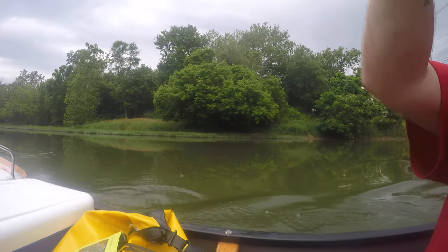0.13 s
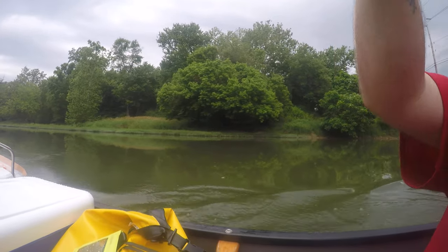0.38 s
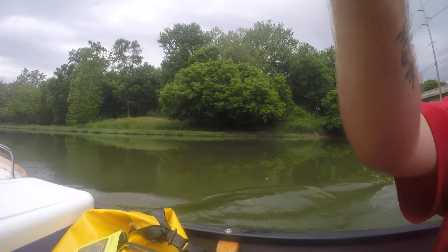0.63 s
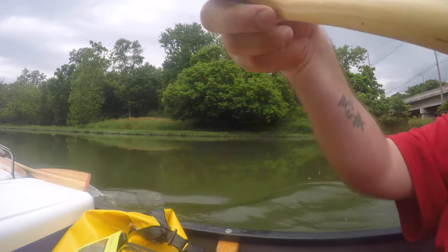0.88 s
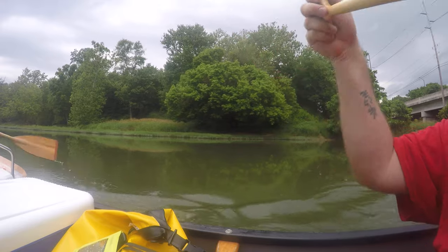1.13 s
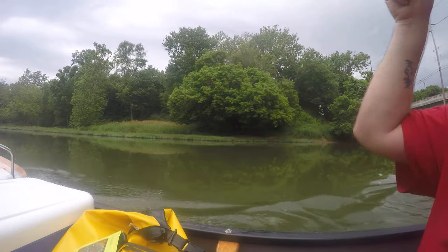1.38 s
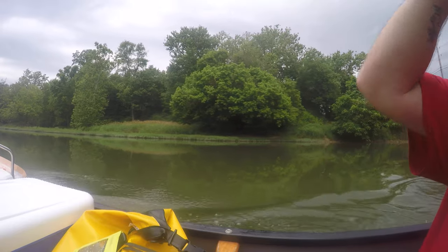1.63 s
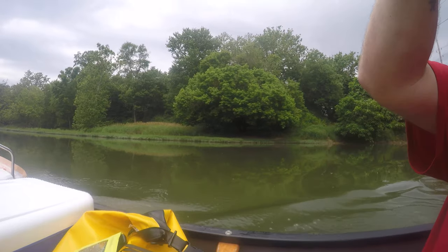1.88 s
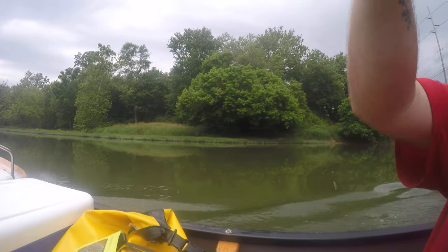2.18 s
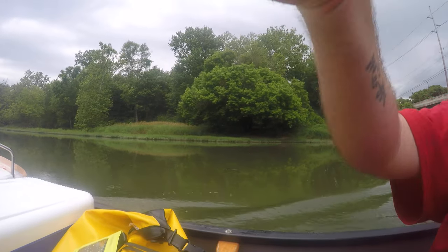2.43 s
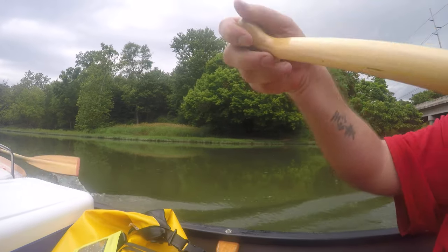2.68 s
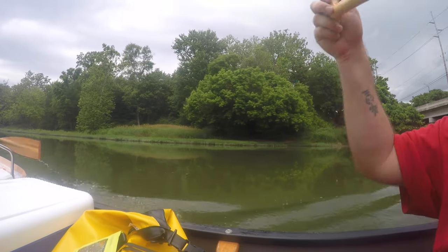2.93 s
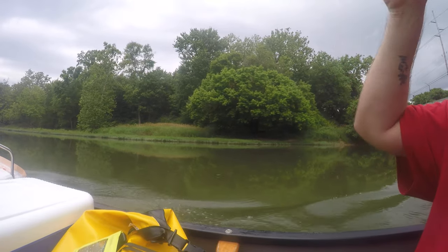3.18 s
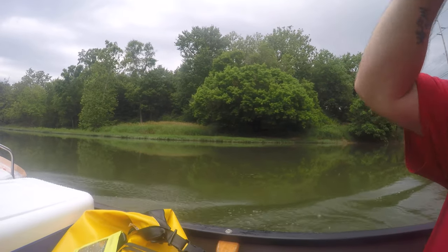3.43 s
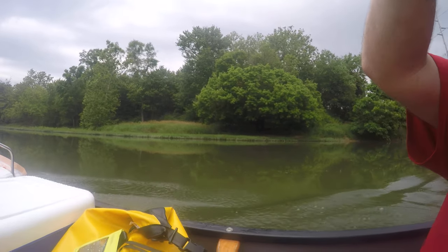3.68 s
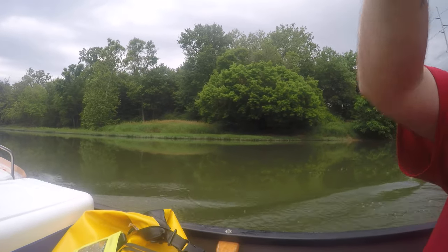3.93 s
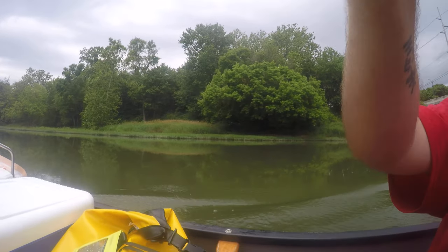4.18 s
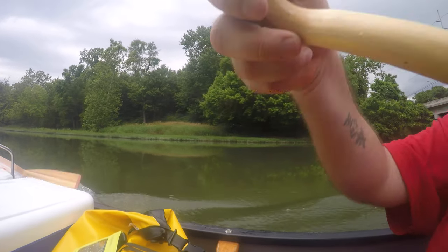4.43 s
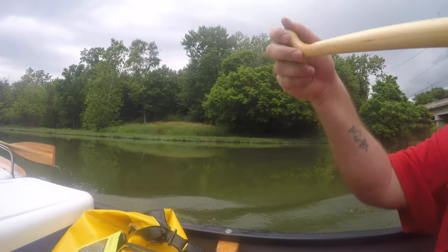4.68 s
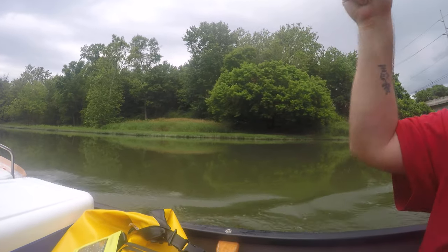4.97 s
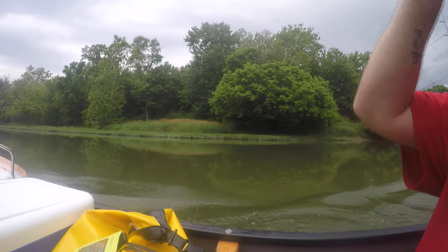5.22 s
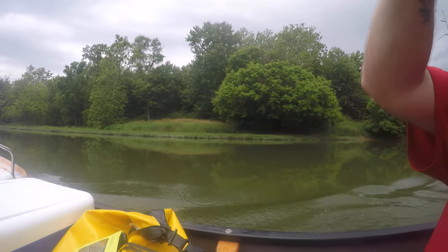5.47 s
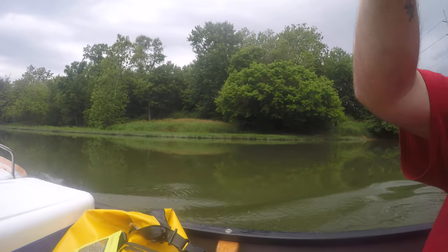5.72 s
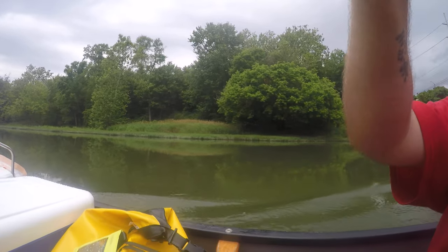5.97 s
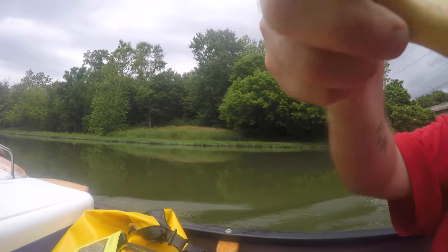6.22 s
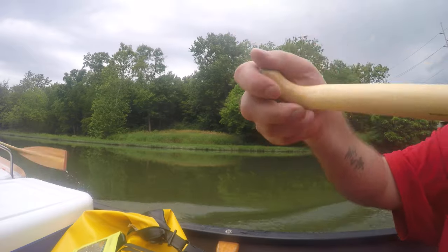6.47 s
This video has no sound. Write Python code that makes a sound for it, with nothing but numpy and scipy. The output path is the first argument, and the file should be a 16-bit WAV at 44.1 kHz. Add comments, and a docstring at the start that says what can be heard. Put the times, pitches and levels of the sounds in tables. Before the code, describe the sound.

The sound is close, woody and muffled, as if heard through the canoe hull, outdoors on a river. Water laps at the start, and at 0.1 s a paddle shaft cracks loudly on the rim, the hull booming dully; a bounce at 0.2 and loose rocking follow to 0.5. From 0.6 to 1.2 the shaft slips in small ticks, with dull bumps. A drop plinks near 1.6. The second hard knock comes at 1.95, bouncing at 2.04 with rattling gear; water thumps around 2.5. The third knock at 3.7 bounces at 3.8 and rocks on, then low water surges at 4.4 amid ticks. After a quieter spell, ticks at 5.7 lead to a somewhat softer knock at 5.8. At 6.16 a deep double gulp, drops and wash burst out, followed by rapid shaft ticks and a low thump to 6.5. Faint traffic hiss and thin bird whistles lie behind.

```python
"""Water laps on a canoe and, almost at once, a wooden paddle knocks hard on the rim, then bounces and rocks.
All is heard through the hull. Touches ring lists of fading tones: wall ticks, deep hull booms, bright rim snaps;
shaped noise makes loose gear rattle. The shaft also ticks as it slips along the rim, and dull bumps boom.
Ripples are noise that rings the hull; drops, gurgles, spray and gulps are bubbles of rising pitch.
Far traffic is steady noise, and a bird is short whistles. Loud sounds turn the gain down for a while."""
import sys
import numpy as np
from scipy import signal
from scipy.fft import rfft, irfft, next_fast_len
from scipy.io import wavfile
from scipy.ndimage import map_coordinates

SR = 44100
rng = np.random.default_rng(int(sys.argv[2]) if len(sys.argv) > 2 else 0)


def undo_db(level):
    """Turn decibels back into plain size, where 20 dB means ten times bigger."""
    steps = np.asarray(level, float) / 20
    return 10 ** steps


def wrap_up_sound(samples):
    """Save the sound to the file named by the first command line argument, as 16-bit audio."""
    columns = np.atleast_2d(samples).T
    # keep every value between -1 and 1, then stretch to whole-number steps
    tamed = np.clip(columns, -1, 1)
    steps = np.round(tamed * 32767).astype(np.int16)
    wavfile.write(sys.argv[1], SR, steps)


N = 291060  # length in samples

# slow tones of the whole hull: [pitch_hz, level_db (relative), time_to_fall_60_db_s, first_swing (+1 or -1)]
BOOM = [(40, -15, 0.2, -1), (62.5, -1, 0.27, -1), (106, -5, 0.05, 1), (134.8, -1.5, .06, 1),
        (180, -1.5, 0.12, 1), (250, -6, 0.09, 1), (368, -14, .1, 1), (426, -9, 0.075, 1), (590, -26, .1, 1),
        (789, -20.5, 0.068, -1), (976, -24, 0.086, 1)]
BOOM_OCTAVES = np.log2(np.array(BOOM)[:, 0] / BOOM[1][0])  # distance of each tone from the second one
BOOM_SWING = np.sign(BOOM)[:, 3]
# the shaft strikes the rim once a stroke: [start_s, tick_level_db, boom_loss_db_per_octave]
BLOWS = [(0.112, 4.5, 6.5), (1.9532, 3.5, 2), (3.711, 3, 1.9), (5.7957, -0.5, 2)]
# the shaft bounces back onto the rim: [start_s, tick_level_db, boom_over_tick_db]
BOUNCES = [(0.198, -19.5, 15.5), (2.041, -13.5, 6), (3.798, -10, 2.5), (5.874, -20.5, 5)]
# the shaft rocks loosely on the rim: [start_s, tick_level_db]
ROCKS = [(0.26, -24.5), (0.431, -25.5), (0.52, -23.5), (2.073, -25.5), (2.102, -24), (2.175, -24),
         (2.268, -24.5), (2.304, -31.5), (3.857, -32), (3.924, -20.5), (4.009, -23.5), (3.451, -46),
         (4.043, -34), (5.993, -33.5), (4.169, -32.5), (5.129, -35.5), (5.824, -20.5), (5.902, -21),
         (5.939, -33.5), (6.014, -31)]
# water on the hull over time: [time_s, pressure_db, wash_db]
WATER = [(0, -15.5, -37.5), (0.08, -28.5, -73.5), (0.35, -30, -47), (0.57, -33.5, -60), (0.7, -31, -63),
         (0.95, -31.5, -81.5), (1.45, -48, -69), (1.72, -35.5, -67), (2.2, -36, -49.5),
         (2.42, -31.5, -58.5), (2.52, -22.5, -65), (2.72, -40, -73), (2.85, -33, -76.5), (3.1, -41, -76),
         (3.58, -38, -69), (3.95, -28, -54.5), (4.18, -34.5, -55), (4.32, -26.5, -51), (4.42, -19, -88),
         (4.55, -35, -67.5), (5.1, -39.5, -71.5), (5.22, -29, -68.5), (5.45, -48.5, -80),
         (5.68, -33.5, -69.5), (5.9, -24, -57), (6.08, -22.5, -53.5), (6.16, -17.5, -43.5),
         (6.22, -28.5, -55.5), (6.45, -15, -66), (6.6, -33, -70)]


def unit(x):
    """Scales a sound to an average strength (rms) of 1."""
    return x / np.sqrt(np.mean(x ** 2) + 1e-20)


def curves(rows):
    """Joins the points of each column after the time by straight lines, one value per sample."""
    times, *columns = np.transpose(rows)
    return [np.interp(np.arange(N) / SR, times, column) for column in columns]


def wobble(rate):
    """A smooth random curve with rate random points a second."""
    points = rng.standard_normal(int(N * rate / SR) + 4)
    return map_coordinates(points, [np.arange(N) * rate / SR])


def noise(spectrum):
    """Noise of rms 1, coloured by points of pitch in Hz and relative level in dB."""
    size = next_fast_len(N + 8192)
    hz, db = np.transpose(spectrum)
    log_pitch = np.log(np.fft.rfftfreq(size, 1 / SR) + 1)
    gain = undo_db(np.interp(log_pitch, np.log(hz + 1), db))
    return unit(irfft(rfft(rng.standard_normal(size)) * gain, size)[:N])


def ring(modes, swing, chance, travel, rise, scatter_db, length):
    """Struck wood as a sum of fading tones; low bending waves are slower, so they arrive later."""
    hz, db, t60 = np.transpose(modes)[:3, :, None]
    delay = travel * (200 / hz) ** .3
    t = np.maximum(np.arange(int(length * SR)) / SR - delay, 0)
    start_db = db + scatter_db * chance[:len(modes), None]
    level = swing[:, None] * undo_db(start_db - 60 * t / t60)
    onset = 1 - np.exp(-t / rise)
    return np.sum(level * onset * np.sin(2 * np.pi * hz * t), axis=0)


def bubble(db, hz, turns, rise):
    """A trapped air bubble: its pitch rises as it dies; turns / hz is its 60 dB decay time."""
    t = np.arange(SR // 12) / SR
    life = turns / hz
    onset = 1 - np.exp(-t / min(.002, life / 10))
    shape = undo_db(db - 60 * t / life) * onset
    return shape * np.sin(2 * np.pi * hz * t * (.97 + rise * t / life))


def add(out, s, sound):
    """Mixes a sound in at time s, in seconds."""
    part = out[round(s * SR):][:len(sound)]
    part += sound[:len(part)]


def contacts():
    """Lists every touch of the paddle and bump on the hull, with how it excites wall, hull and gear."""
    # the loaded shaft slips along the rim in crisp jerks: [start_s, tick_level_db]
    slips = [(0.59, -31.5), (0.624, -30), (0.648, -30), (0.683, -24), (0.744, -34), (0.831, -19.5),
             (0.873, -23.5), (0.937, -48), (1.131, -24), (1.208, -34.5), (1.944, -33), (2.479, -35),
             (2.51, -30), (2.558, -29.5), (2.614, -33.5), (2.776, -34.5), (2.847, -27), (4.121, -27),
             (4.258, -29.5), (4.299, -35), (4.374, -24.5), (4.411, -23.5), (4.581, -31), (5.512, -38.5),
             (5.715, -19), (5.743, -25.5), (5.775, -23), (6.129, -29), (6.245, -22), (6.282, -19),
             (6.313, -21.5), (6.341, -21.5), (6.376, -23.5), (6.423, -23)]
    # dull bumps on the hull, without a tick: [start_s, boom_level_db, boom_loss_db_per_octave]
    bumps = [(0.71, -25, 5.5), (1.134, -20, 12), (1.697, -28.5, 4.5), (2.47, -22, 2), (2.48, -16.5, 3),
             (2.774, -23.5, 7.5), (2.814, -21.5, 5), (3.576, -31, 4.5), (4.266, -22.5, 6.5),
             (4.318, -28, 4), (4.34, -22, 4), (4.583, -21, 9.5), (5.151, -36, -0.5), (6.166, -36, -1),
             (6.19, -27.5, 1.5)]
    gear_db, loose_gear_db = -23.5, -13  # rattle over tick; the second for bounces and rocking
    # each row: [start_s, tick_db, boom_db, boom_loss_db_per_octave, rattle_over_tick_db,
    #            tick_spread_db, boom_spread_db]
    rows = [(s, db, db - 1, loss_db, gear_db, 1.5, .7) for s, db, loss_db in BLOWS]
    # each bounce booms as dully as the blow before it
    for (s, db, boom_db), blow in zip(BOUNCES, BLOWS):
        rows.append((s, db, db + boom_db, blow[2], loose_gear_db, 3, 1.5))
    # light rocking favours the upper hull tones, differently each time
    rows += [(s, db, db - 8, -0.5, loose_gear_db, 5, 4.5) for s, db in ROCKS]
    # the slow shove of a slip moves the deep hull tones most
    rows += [(s, db, db + 3, 7.5, gear_db, 2.5, 2) for s, db in slips]
    rows += [(s, -np.inf, db, loss_db, 0, 0, 2) for s, db, loss_db in bumps]
    return rows


def paddle():
    """Touches tick in the wall, boom in the whole hull and shake loose gear; bumps only boom."""
    # quick tones of the wall: [pitch_hz, level_db (relative), time_to_fall_60_db_s]
    wall_modes = [(547, -18, 0.098), (741, -2, 0.015), (904, -4.5, 0.012), (1012, -10.5, 0.023),
                  (1169.5, -3.5, 0.009), (1410.5, -8, 0.018), (2100, -24.5, 0.02), (2220, -28, 0.0056)]
    # colour of the loose gear: [pitch_hz, level_db_per_hz (relative)]
    gear_colour = [(250, -40.5), (450, 6.5), (1500, -3), (2400, -20.5), (4000, -32), (15000, -48.5)]
    edge_db, edge_hz = 9, 1800  # lighter touches are crisper than blows above this pitch
    rattle_t60_s, soft_hz = 0.077, 2670  # lighter touches shake the gear mostly below soft_hz
    ticks, booms, hard_shake, soft_shake = np.zeros((4, N))
    rows = contacts()
    chance = rng.standard_normal((len(rows), 2, 16))
    # the second and sixth wall tones swing against the rest
    opposed = np.where(np.arange(len(wall_modes)) % 4 == 1, 1, -1)
    crisp = undo_db(edge_db * (np.array(wall_modes)[:, 0] > edge_hz))
    rattle_fade_db = -60 * np.arange(SR // 5) / SR / rattle_t60_s
    first_rock = len(BLOWS + BOUNCES)
    struck = first_rock + len(ROCKS)  # the rows after these are slips and bumps
    for k, (row, (tick_chance, boom_chance)) in enumerate(zip(rows, chance)):
        s, db, boom_db, loss_db, rattle_db, tick_spread_db, boom_spread_db = row
        is_blow, is_struck = k < len(BLOWS), k < struck
        is_rock = first_rock <= k < struck
        tick = ring(wall_modes, opposed * (1 if is_blow else crisp), tick_chance, travel=.0003,
                    rise=.002 if is_rock else .0003, scatter_db=tick_spread_db, length=.07)
        # in slips and bumps the load is let go: the hull springs back, the other way round and slower
        direction = 1 if is_struck else -1
        boom = ring(BOOM, direction * BOOM_SWING * undo_db(-loss_db * BOOM_OCTAVES), boom_chance, travel=.0041,
                    rise=.0008 if is_struck else .005, scatter_db=boom_spread_db, length=.4)
        add(ticks, s, undo_db(db) * tick)
        add(booms, s, undo_db(boom_db) * boom)
        add(hard_shake if is_blow else soft_shake, s + 0.0033, undo_db(db + rattle_db + rattle_fade_db))
    gear = unit(undo_db(4.5 * wobble(220)) * noise(gear_colour))
    low_pass = signal.butter(3, soft_hz, fs=SR, output='sos')
    rattle = hard_shake * gear + signal.sosfilt(low_pass, soft_shake * gear)
    touch = np.hanning(15)  # wood on the rim presses for a third of a millisecond
    return np.convolve(ticks, touch / touch.sum())[:N] + booms + rattle


def clicks():
    """A small, hard contact cracks and rings only the stiff rim; each blow adds such a snap."""
    # tones of the stiff rim: [pitch_hz, level_db (relative), time_to_fall_60_db_s]
    rim_modes = [(2080, -3, .011), (2450, -4, .012), (1700, -5, .01), (3270, -16, .01), (3800, -4, .009),
                 (6600, -17, .008), (8400, -20, .006), (1873, -35, .16), (3120, -36, .09)]
    # hard clicks on the rim: [start_s, level_db, treble_tilt_db_per_octave, crack_over_ring_db]
    hard_touches = [(0.1249, 3, -4, -1.5), (1.8265, -32.5, -13.5, -23.5), (5.44, -41, 5.5, -19),
                    (6.3224, -44.5, -8, 7.5), (6.342, -43.5, 9, 2)]
    crack_t60_s, crack_hz = 0.005, 4500  # every crack is dull above crack_hz
    out = np.zeros(N)
    t = np.arange(SR // 100) / SR
    # the snap grows 2.5 dB for each dB of the blow
    rows = hard_touches + [(s, 2.5 * db - 33, 0, -6) for s, db, _ in BLOWS]
    low_pass = signal.butter(2, crack_hz, fs=SR)
    for s, db, tilt_db, crack_db in rows:
        swing, chance = rng.standard_normal((2, len(rim_modes)))
        modes = [(hz, level + tilt_db * np.log2(hz / 2500), t60) for hz, level, t60 in rim_modes]
        snap = ring(modes, np.sign(swing), chance, travel=0.0001, rise=0.0001, scatter_db=2.5, length=0.3)
        crack = signal.lfilter(*low_pass, rng.standard_normal(len(t)))
        add(out, s, undo_db(db) * snap)
        add(out, s, undo_db(db + crack_db - 60 * t / crack_t60_s) * crack)
    return out


def hull(push):
    """A varying push on the hull sets its slow tones ringing, the upper ones a little more."""
    swing = undo_db(1 * BOOM_OCTAVES) * BOOM_SWING  # 1 dB more per octave
    body = ring(BOOM, swing, np.zeros(len(BOOM)), travel=0, rise=.0008, scatter_db=0, length=.4)
    return unit(signal.fftconvolve(push, body)[:N])


def water():
    """Ripples thump the hull in lumps, as noise; the wash hisses and gurgles along the wall."""
    # colours of the slosh, swell push, small-ripple push and wash: [pitch_hz, level_db_per_hz (relative)]
    slosh_colour = [(20, 1.5), (45, -1.5), (85, -7.5), (120, -18), (300, -54.5), (600, -120)]
    swell_colour = [(20, -0.5), (70, -4), (110, -10.5), (250, -46.5), (600, -120)]
    ripple_colour = [(60, -51), (120, -1), (180, -1), (250, -3), (370, -12.5), (550, -6.5), (900, -42.5)]
    wash_colour = [(300, -45.5), (500, -25), (850, 9.5), (1100, -1), (1450, 11.5), (1700, -13),
                   (2500, -58.5)]
    slosh_db, ring_db = -3.5, -8  # slosh that rings nothing and ringing of the hull, over the pressure
    lumps_db, lap_lumps_db = 4.5, 5  # depth of the thumping
    pressure_db, wash_db = curves(WATER)
    lap_db = pressure_db - 1.5 + 0.49 * (wash_db - pressure_db)  # about halfway to the wash
    lumps = wobble(13)
    slosh = undo_db(pressure_db + slosh_db) * unit(undo_db(lumps_db * lumps) * noise(slosh_colour))
    ringing = undo_db(pressure_db + ring_db) * hull(undo_db(lumps_db * lumps) * noise(swell_colour))
    ripples = undo_db(lap_lumps_db * lumps + 3 * wobble(30)) * noise(ripple_colour)
    lap = undo_db(lap_db) * hull(ripples)
    hiss = unit(undo_db(1.5 * lumps + 4 * wobble(60)) * noise(wash_colour))
    gurgle = np.zeros(N)
    for when, size, pitch in rng.random((900, 3)):
        sound = bubble(-2.5 * np.log(size + .03), 700 * 2.2 ** pitch, turns=30, rise=.2)
        add(gurgle, when * N / SR, sound)
    wash = undo_db(wash_db) * (undo_db(-1.5) * hiss + unit(gurgle))
    return slosh + ringing + lap + wash


def gulps():
    """Large air pockets gulp under the hull as short, deep bubbles."""
    # [start_s, level_db, pitch_hz]
    pockets = [(5.13, -41.5, 264), (6.167, -19, 160), (6.189, -16.5, 136.6)]
    out = np.zeros(N)
    for s, db, hz in pockets:
        add(out, s, bubble(db, hz, turns=23, rise=0.092))
    return out


def drops():
    """Single drops fall off the blade, each sounding as a bubble."""
    # [start_s, level_db, pitch_hz]
    falling = [(0.394, -30, 1710), (1.62, -34, 980), (3.07, -44.5, 830), (3.138, -33.5, 1580),
               (3.315, -48, 827), (3.393, -44.5, 837), (4.296, -31.5, 1380), (4.71, -39.5, 1420),
               (5.182, -38, 1460), (5.187, -39.5, 1055), (6.112, -33, 1424), (6.155, -23, 1418),
               (6.158, -26.5, 966)]
    out = np.zeros(N)
    for s, db, hz in falling:
        add(out, s, bubble(db, hz, turns=60, rise=.1))
    return out


def spray():
    """Small droplets patter as bubbles, louder with the wash; each blow shakes more off the shaft."""
    spray_db, follows_wash = -70, .3  # rms at a wash of -60 dB, and how far it follows the wash
    shaken_db, shaken_s = -53, .4  # largest droplet after a blow, and how long they fall
    wash_db = curves(WATER)[1]
    patter = np.zeros(N)
    for when, size, pitch in rng.random((500, 3)):
        sound = bubble(-2.8 * np.log(size + .02), 1800 * 3.5 ** pitch ** 2, turns=16, rise=.2)
        add(patter, when * N / SR, sound)
    out = undo_db(spray_db + follows_wash * (wash_db + 60)) * unit(patter)
    for s, *_ in BLOWS:
        for when, size, pitch in rng.random((60, 3)):
            sound = bubble(shaken_db - 14 * size, 3000 * 3.5 ** pitch, turns=7, rise=.2)
            add(out, s + shaken_s * when ** 3, sound)  # the cube makes most fall early
    return out


def bird():
    """Thin whistles from the bank: pure tones that swell and fade, wavering 30 times a second."""
    # [start_s, length_s, level_db, pitch_hz]
    notes = [(1.283, 0.05, -69, 7050), (2.968, 0.054, -66, 7080), (5.255, 0.067, -67, 5400),
             (6.023, .04, -65, 3290), (6.134, 0.091, -60.5, 3300), (6.25, 0.067, -64, 3300)]
    out = np.zeros(N)
    for s, length, db, hz in notes:
        t = np.arange(int(length * SR)) / SR
        waver = 0.76 * np.sin(2 * np.pi * 30 * t)
        swell = np.sin(np.pi * t / length)
        add(out, s, undo_db(db) * swell * np.sin(2 * np.pi * hz * t + waver))
    return out


def far():
    """Distant traffic and hiss: coloured noise, swelling a little."""
    # [pitch_hz, level_db_per_hz (relative)]
    far_colour = [(250, -19), (400, -13), (700, -9.5), (1000, -8.5), (1350, -11), (1650, -0.5), (1950, -12),
                  (2500, -10), (3200, -17.5), (5000, -22), (8400, -27.5), (12500, -29.5), (14000, -24.5),
                  (15500, -30)]
    swell_db = .7 * wobble(3) + .7 * wobble(25)
    return undo_db(-58.5 + swell_db) * noise(far_colour)


def scene():
    """All sources on one microphone."""
    return (paddle() + clicks() + drops() + gulps() + water() + spray() + far() + bird())[None]


def gain_control(x):
    """Time spent near overload slowly turns the gain down, by up to 10.5 dB; then it creeps back."""
    feel_s = 0.009  # overload time that counts as 1; smaller reacts more
    u = np.arange(2 * SR) / SR / .3  # the effect of an overload peaks 0.3 s later
    memory = (u * np.exp(1 - u)) ** 2
    overload = np.clip(4 * (np.abs(x) / undo_db(-2.5) - 1), 0, 1)
    debt = signal.fftconvolve(overload, memory[None] / SR)[:, :N] / feel_s
    return x * undo_db(-10.5 * np.tanh(np.abs(debt) ** 1.3))


def top_cut(x):
    """Nothing passes above the cut-off."""
    return signal.sosfilt(signal.butter(12, 15450, fs=SR, output="sos"), x)


def record(dry):
    """Gain control, then soft clipping that rounds off peaks near 0.96."""
    x = gain_control(dry)
    mix = x / (1 + np.abs(x / .96) ** 5) ** (1 / 5)
    return top_cut(mix)


dry = scene()
out = record(dry)
wrap_up_sound(out)
```